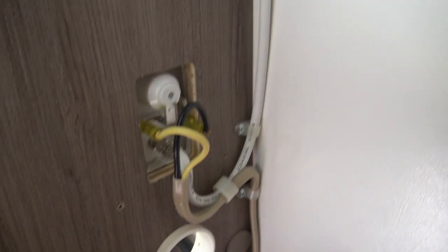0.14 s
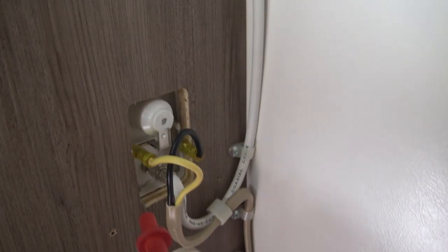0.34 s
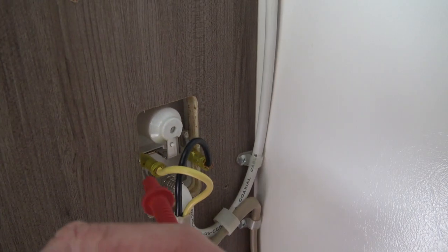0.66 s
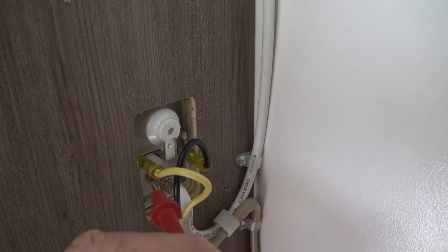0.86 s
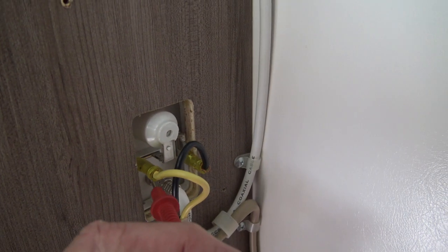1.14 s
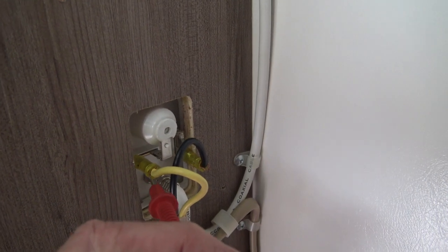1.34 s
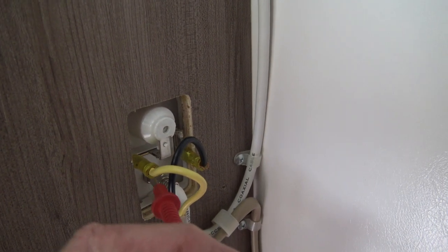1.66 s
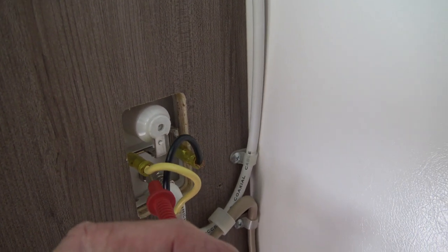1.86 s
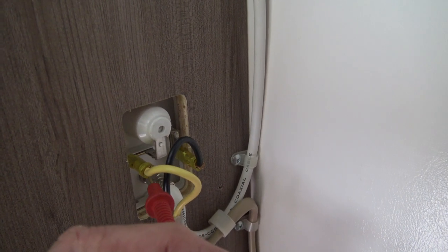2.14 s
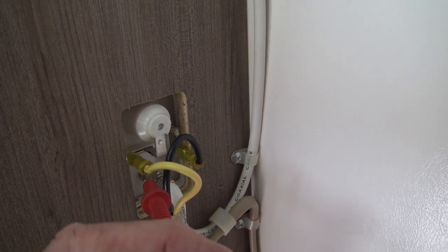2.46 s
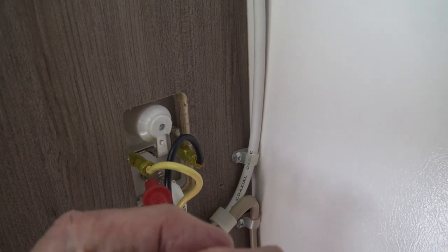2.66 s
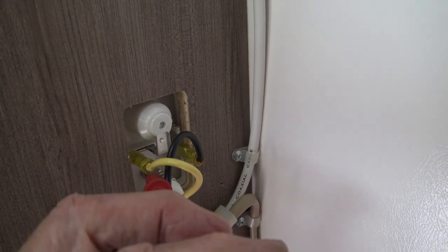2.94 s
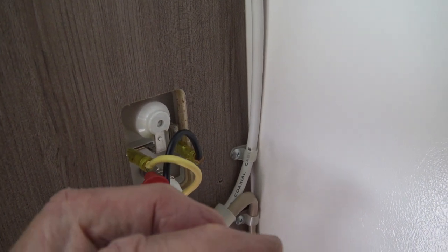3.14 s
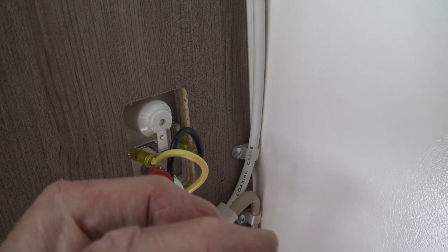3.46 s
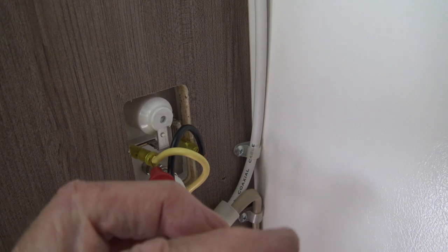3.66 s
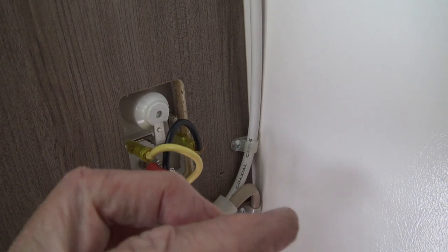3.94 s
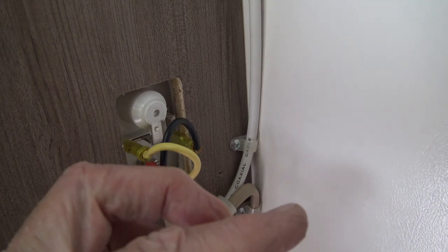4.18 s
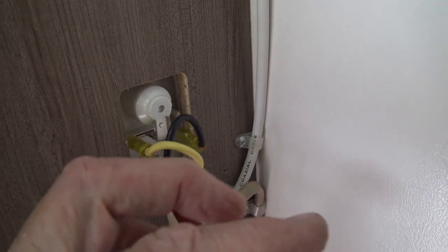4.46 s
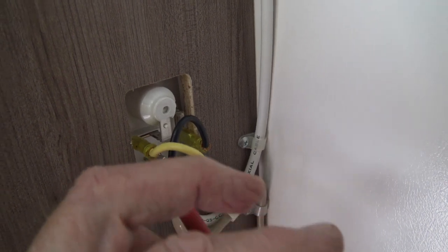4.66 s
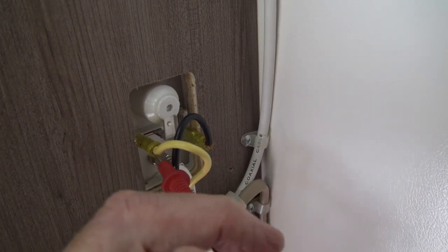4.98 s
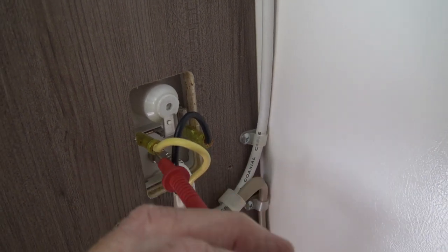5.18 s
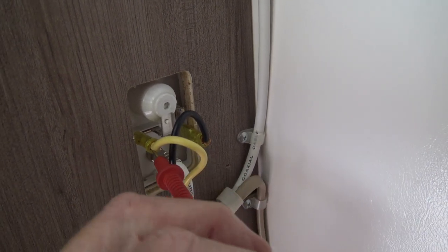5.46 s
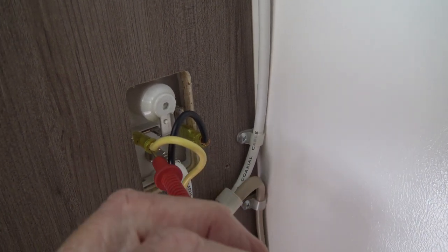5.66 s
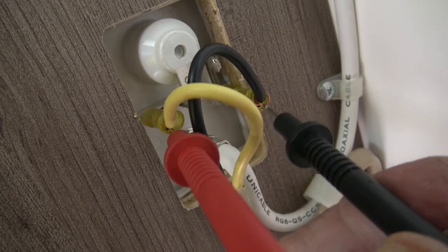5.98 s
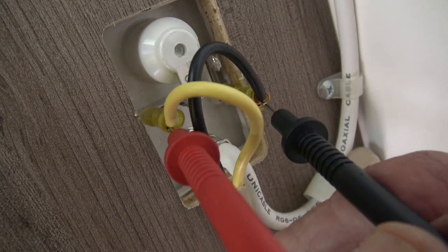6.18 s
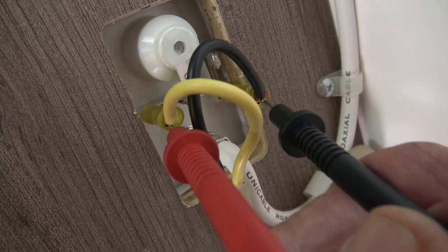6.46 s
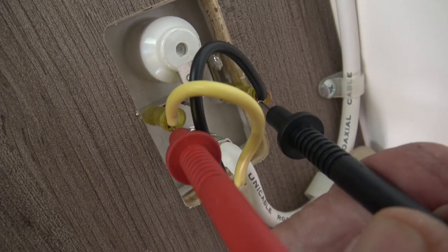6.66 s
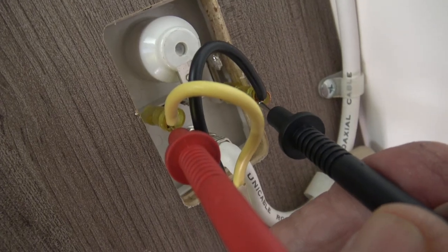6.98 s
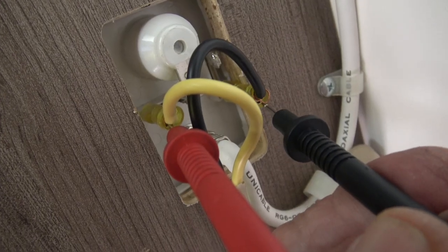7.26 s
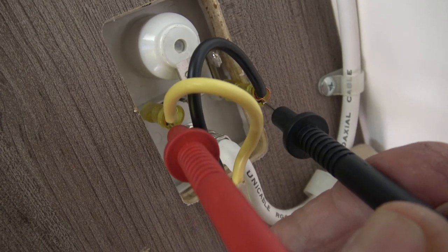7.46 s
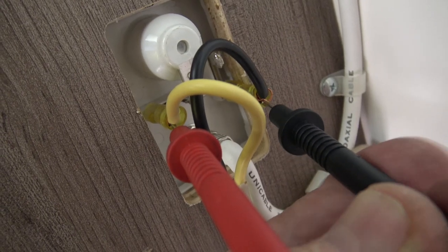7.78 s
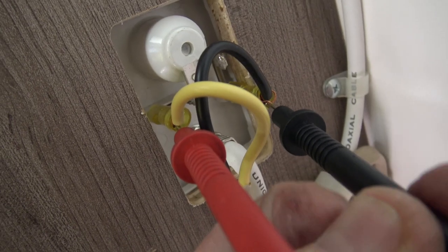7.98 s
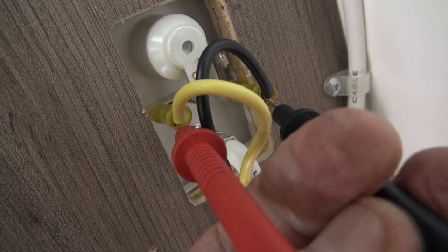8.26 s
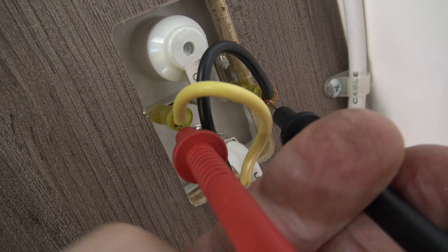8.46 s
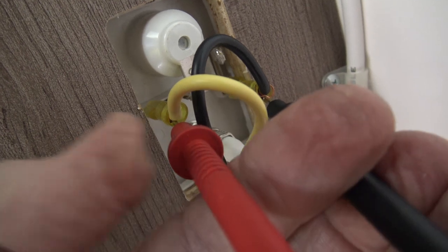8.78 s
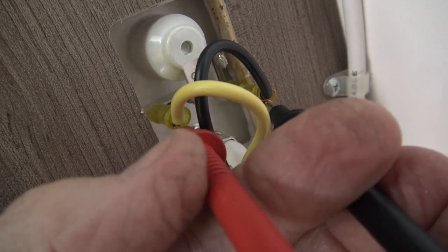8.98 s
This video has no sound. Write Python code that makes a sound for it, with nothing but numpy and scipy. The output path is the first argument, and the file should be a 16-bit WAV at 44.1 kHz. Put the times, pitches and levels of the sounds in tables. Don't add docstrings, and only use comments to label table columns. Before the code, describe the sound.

Irregular dry ticks and dull hollow thumps, one hard knock early on, then metallic clicks and scratchy slips over faint hum and hiss.

```python
import sys
import numpy as np
from scipy import signal
from scipy.fft import rfft, irfft, next_fast_len
from scipy.io import wavfile
from scipy.ndimage import uniform_filter1d

SR = 44100
rng = np.random.default_rng(int(sys.argv[2]) if len(sys.argv) > 2 else 0)


def materialize(psi):
    bounded = np.clip(np.atleast_2d(psi).T, -1, 1)
    quanta = np.round(bounded * 32767).astype(np.int16)
    wavfile.write(sys.argv[1], SR, quanta)


def gain_from_db(level_db):
    decades = np.asarray(level_db, float) / 20
    return 10 ** decades


N = 402015

# mode_hz, width_hz, level_db
CONNECTOR = [(660, 91, 18), (1763, 27, 3), (1985, 45, 8), (2740, 19, -4), (3250, 210, -7), (3840, 95, -4.5),
             (4900, 60, -22), (5800, 51, -19)]
# start_s, strength_db, depth_db, hardness_db, off_centre_db
THUMPS = [(1.594, -29.5, 4, -7, -6), (1.714, -26.5, 0, -3.5, 1), (2.747, -25.5, -5, -7, -2),
          (2.8048, -17.5, 0.5, -0.5, 3), (2.829, -22, 9.5, -3, 1.5), (2.865, -37.5, 9, 2, -17),
          (3.277, -38.5, 15, -3, -6), (3.354, -50, 22, 5, -13), (3.375, -35.5, -19, -4.5, -17),
          (3.62, -35.5, -0.5, 2, 6), (3.689, -34, 0, -10, 0), (3.747, -12, -0.5, -13.5, 1.5),
          (3.954, -26.5, 8.5, -9.5, 2), (3.9898, -38, 9, 1, -19), (4.221, -20, -2, -11.5, -1.5),
          (5.249, -26.5, -3.5, -5, 0.5), (5.88, -32, 1, -8, -6), (7.014, -28, 0, -7, -2),
          (7.599, -30, 2.5, -1, -3), (7.624, -31, -27, 2, -6.5), (7.825, -32, -0.5, -7.5, 1),
          (8.046, -22, -4, -5.5, -6)]


def evened(x):
    return x / np.sqrt(np.mean(x ** 2) + 1e-20)


def read(points, hz):
    f, value = np.transpose(points)
    return np.interp(np.log(hz + 1), np.log(f + 1), value)


def curve(rows, column=1):
    rows = np.array(rows)
    return np.interp(np.arange(N) / SR, rows[:, 0], rows[:, column])


def band(x, lo_hz, hi_hz, order=2):
    edges_hz = [lo_hz, min(hi_hz, .45 * SR)]
    return signal.sosfilt(signal.butter(order, edges_hz, "band", fs=SR, output="sos"), x)


def coloured(x, points):
    size = next_fast_len(N)
    gain = gain_from_db(read(points, np.fft.rfftfreq(size, 1 / SR)))
    return evened(irfft(rfft(x, size) * gain, size)[..., :N])


def resonate(x, hz, width_hz):
    r = np.exp(-np.pi * width_hz / SR)
    return 2 * signal.lfilter([1 - r], [1, -r * np.exp(2j * np.pi * hz / SR)], x).real


def body(x, modes, widen=1.0):
    skirt = 3
    total = 0
    for k, (hz, width_hz, db) in enumerate(modes):
        core = resonate(x, hz, widen * width_hz)
        total = total + (-1) ** k * gain_from_db(db) * evened(resonate(core, hz, skirt * widen * width_hz))
    return evened(total)


def add(mix, s, sound):
    part = mix[..., max(round(s * SR), 0):][..., :sound.shape[-1]]
    part += sound[..., :part.shape[-1]]


def grit(lumpy_db, lump_s, size=N):
    lumps, noise = rng.standard_normal((2, size))
    width = round(lump_s * SR)
    lumps = evened(uniform_filter1d(uniform_filter1d(lumps, width), width))
    return evened(noise * gain_from_db(lumpy_db * 2 * np.tanh(lumps / 2)))


def strokes(rows, controls, voice):
    out = np.zeros(N)
    for s, length_s, *strength in rows:
        part = np.linspace(0, 1, round(length_s * SR))
        add(out, s, voice(*controls(part, *strength)) * signal.windows.tukey(len(part), .12))
    return out


def drag(part, first_db, last_db):
    grip, let_go, edge_db = 0.27, 0.82, -5
    levels_db = [first_db + edge_db, first_db, last_db, last_db + edge_db]
    return [np.interp(part, [0, grip, let_go, 1], levels_db)]


def struck(modes, hits, shorten):
    out, t = np.zeros(N), np.arange(round(.15 * SR)) / SR
    hz, db, t60_s = np.transpose(modes)[..., None]
    draws = rng.standard_normal((len(hits), 2, len(modes), 1))
    for (s, hit_db, tilt_db), (detune, luck) in zip(hits, draws):
        level_db = hit_db + db + 0.85 * luck - tilt_db * np.log2(hz / 1600) - 60 * t / (shorten * t60_s)
        tones = np.sin(2 * np.pi * hz * (1 + 0.0066 * detune) * t) * np.sign(detune)
        add(out, s, (gain_from_db(level_db) * tones).sum(0) * np.minimum(t / 0.00055, 1))
    return out


def cabin(x):
    # band_hz, t60_s
    decay = [(500, 0.12), (1300, 0.092), (3500, 0.045), (9200, 0.066)]
    count = SR // 5
    taps = np.zeros((2, count))
    at = np.arange(120, count - 20, 20)
    at = at + rng.integers(0, 20, (2, len(at)))
    np.put_along_axis(taps, at, rng.choice([-1., 1.], at.shape), 1)
    taps[1] = 0.7 * taps[0] + .5 * taps[1]
    hz, t, z = signal.stft(taps, SR, nperseg=256)
    tail = signal.istft(z * gain_from_db(-60 * t / read(decay, hz)[:, None]), SR, nperseg=256)[1]
    return signal.fftconvolve(x[None], tail / np.linalg.norm(tail[0]), axes=1)[:, :N]


def background():
    # band_hz, density_db
    hum_spectrum = [(15, -53), (25, -48), (127, 0), (170, -19), (301, -14), (363, -10.5), (560, -34),
                    (641, -27.5), (840, -25), (1190, -38), (2910, -33), (16000, -38)]
    # time_s, level_db
    murmur = [(0, -41), (.2, -49), (0.32, -43), (.43, -49), (0.6, -53), (1.05, -51), (1.4, -56),
              (2.5, -54.5), (2.95, -52), (3.3, -64), (4, -46), (4.5, -55), (5.6, -60.5), (6.5, -53.5),
              (9.11, -58)]
    hum_db = -51.5
    common, own, low, sub = rng.standard_normal((4, N))
    own = 0.062 * own + 0.15 * band(own, 99, 3300) + .5 * band(own, 4460, 9900)
    hum = coloured(np.array([common + own, common - own]), hum_spectrum)
    rumble = evened(band(low, 58.8, 75.6, order=3)) + 0.2 * evened(band(sub, 37.7, 43, order=3))
    return gain_from_db(hum_db) * hum + gain_from_db(curve(murmur) + 1.0) * rumble


def peeps():
    # start_s, length_s, pitch_hz, peak_db, glide_hz
    calls = [
        (7.724, 0.013, 3280, -58, -60),
        (7.746, 0.029, 3180, -53, 120),
        (7.878, .016, 3350, -56, -120),
        (7.89, 0.03, 2830, -55, -40),
    ]
    out = np.zeros(N)
    for s, length_s, hz, db, glide_hz in calls:
        t = np.arange(round(length_s * SR)) / SR
        tone = np.sin(2 * np.pi * (hz + glide_hz * t / length_s / 2) * t)
        add(out, s, gain_from_db(db) * tone * signal.windows.tukey(len(t), .4))
    return out


def shudder():
    sway_hz, t60_s, sway_db = 37.7, 0.99, -26
    out, t = np.zeros(N), np.arange(SR) / SR
    sway = np.minimum(t / 0.024, 1) * gain_from_db(-60 * t / t60_s) * np.sin(2 * np.pi * sway_hz * t)
    for s, push_db, depth_db, *_ in THUMPS:
        add(out, s, gain_from_db(push_db + depth_db + sway_db) * sway)
    return out


def rustle():
    # time_s, level_db
    motion = [(0, -44), (.25, -44), (.4, -46.5), (.47, -50.5), (1.05, -57.5), (1.5, -55), (2.28, -59),
              (2.6, -58), (3.4, -56), (3.68, -59.5), (3.9, -54), (4.65, -57), (5.35, -52.5), (5.6, -58),
              (7.5, -63), (8.15, -57), (8.5, -59.5), (9.11, -63.5)]
    # band_hz, density_db
    dull = [(300, 2.5), (500, -6), (630, -3), (720, -1), (1050, 5.5), (1900, 0.5), (3200, -17), (4600, -70),
            (7700, -54)]
    bright = [(1500, -16.5), (2600, -3.5), (3800, -2.5), (7000, -5), (11500, -11), (15200, -17),
              (16000, -26)]
    n, motion_db = grit(lumpy_db=0.83, lump_s=0.0048), curve(motion)
    bright_db = -57 + 1.7 * (motion_db + 55.5)
    return gain_from_db(motion_db) * coloured(n, dull) + gain_from_db(bright_db) * coloured(n, bright)


def brushes():
    # start_s, length_s, first_db, last_db
    rows = [
        (1.33, 0.05, -53, -54),
        (2.22, 0.049, -52.5, -60),
        (2.83, 0.032, -50, -56),
        (3.745, 0.03, -45, -67),
        (3.86, 0.057, -56, -58),
        (6.316, 0.024, -54, -55),
        (7.317, .024, -54, -58),
        (7.828, 0.058, -47, -59),
        (7, 0.023, -57, -55),
        (8.31, 0.058, -53, -59),
    ]

    def voice(db):
        n = grit(lumpy_db=1.0, lump_s=0.002, size=len(db))
        peak = body(n, [(5850, 290, -1.0), (8370, 140, 2)])
        return gain_from_db(db) * evened(evened(band(n, 4400, 13000)) + 0.62 * peak)
    return strokes(rows, drag, voice)


def sweep(part, whistle_db, hiss_db):
    whistle_top, hiss_top = 0.24, 0.48
    whistle = np.interp(part, [0, 0.57 * whistle_top, whistle_top, .5, 1], [-9, 4.0, 3.5, 0.5, -18])
    hiss = np.interp(part, [0, hiss_top, 1], [-7, 0, -8])
    whistle_hz = 3900 - 306 * np.exp(-part / 0.101)
    return whistle_db + whistle, whistle_hz, hiss_db + hiss


def swish(db, hz, hiss_db):
    n, a, b = rng.standard_normal((3, len(db)))
    turn = 2 * np.pi * np.cumsum(hz) / SR
    fuzz = signal.sosfilt(signal.butter(2, 130, fs=SR, output="sos"), [a, b])
    lines = fuzz[0] * np.sin(turn) + 0.61 * fuzz[1] * np.sin(1.065 * turn)
    whistle = evened(lines + 0.11 * band(n, 2900, 4000))
    climb = 2 * np.pi * np.cumsum(np.linspace(4820, 4820 + 600, len(db))) / SR
    hiss = evened(band(n, 30, 440)) * np.sin(climb)
    hiss = hiss + 0.55 * evened(band(a, 30, 600)) * np.sin(climb)
    hiss = evened(hiss + 0.35 * evened(band(n, 4200, 7500, order=1)))
    grain = gain_from_db(1.2 * evened(uniform_filter1d(b, round(.006 * SR))))
    return grain * (gain_from_db(db) * whistle + gain_from_db(hiss_db) * hiss)


def swishes():
    # start_s, length_s, whistle_db, hiss_db
    rows = [
        (4.72, 0.21, -63, -62),
        (5.06, 0.23, -50, -53),
        (5.27, 0.23, -49.5, -49.5),
    ]
    return strokes(rows, sweep, swish)


def creaks():
    # start_s, length_s, first_db, last_db
    rows = [
        (1.9, .2, -58, -56),
        (2, 0.24, -60, -56),
        (4.4, 0.13, -58, -63),
        (3.15, 0.09, -62, -68),
    ]

    def voice(db):
        n = grit(lumpy_db=5.5, lump_s=0.015, size=len(db))
        return gain_from_db(db) * body(n, [(860, 100, -2.7), (1184, 80, -2), (1680, 85, 1)])
    return strokes(rows, drag, voice)


def squeaks():
    # start_s, length_s, first_db, last_db
    rows = [
        (0.36, 0.1, -44, -46),
        (.35, 0.097, -46, -54),
        (.05, 0.11, -48, -50),
    ]

    def voice(db):
        n = grit(lumpy_db=2.0, lump_s=.01, size=len(db))
        return gain_from_db(db) * body(n, [(1900, 45, -1.5), (2400, 51, 0)])
    return strokes(rows, drag, voice)


def rubs():
    # start_s, length_s, first_db, last_db
    rows = [
        (.27, 0.18, -40.5, -53),
        (.825, 0.11, -44, -43.5),
        (1.29, 0.11, -43.5, -43),
        (2.215, 0.065, -46, -50),
        (2.785, 0.023, -42, -34),
        (2.818, 0.056, -34, -42),
        (3.262, 0.02, -55, -39),
        (3.365, 0.049, -57, -64),
        (3.85, 0.072, -46, -48),
        (4.03, 0.059, -48, -58),
    ]

    def voice(db):
        n = grit(lumpy_db=3.0, lump_s=0.004, size=len(db))
        wide = evened(band(n, 460, 1510)) + .5 * evened(band(n, 1170, 3040, order=3))
        modes = body(n, [(1900, 27, -2), (2400, 320, -8), (2800, 130, -17)])
        return gain_from_db(db - 2.0) * evened(wide + 0.22 * modes)
    return strokes(rows, drag, voice)


def flecks():
    # start_s, level_db, pitch_hz
    rows = [
        (1.595, -50, 8600),
        (1.644, -50, 8500),
        (1.7125, -50, 8500),
        (1.7955, -41, 10200),
        (5.482, -50, 9500),
        (6.322, -50, 5800),
        (7.84, -43, 12500),
        (7.862, -52, 12500),
        (8.05, -51, 11000),
    ]
    out, t = np.zeros(N), np.arange(round(0.045 * SR)) / SR
    for (s, db, hz), n in zip(rows, rng.standard_normal((len(rows), len(t)))):
        speck = evened(band(n, 0.84 * hz, 1.05 * hz))
        add(out, s, gain_from_db(db - 60 * t / 0.049) * np.minimum(t / .0008, 1) * speck)
    return out


def creeps():
    # start_s, length_s, first_db, last_db
    rows = [
        (7.3, .11, -59, -51),
        (6.07, 0.083, -53, -61),
        (7.3, 0.063, -42, -49),
        (8.15, 0.046, -54, -49),
        (9.1, 0.049, -51, -57),
        (8.28, 0.07, -52, -50),
        (6.2, .06, -55, -58),
        (7.2, 0.07, -47, -63),
        (7.335, 0.022, -58, -48),
        (4.6, 0.058, -51, -58),
    ]
    modes = [(557, 91, 1.0), (736, 70, 5), (1650, 90, -1.0), (2050, 60, -15), (2740, 71, -3)]

    def voice(db):
        return gain_from_db(db) * body(grit(lumpy_db=8.0, lump_s=0.0042, size=len(db)), modes)
    return strokes(rows, drag, voice)


def scrapes():
    # start_s, length_s, first_db, last_db
    rows = [(6.322, 0.033, -54, -49), (6.343, 0.059, -49, -37), (6.4, 0.027, -37, -43),
            (6.474, 0.028, -44, -38.5), (6.5, 0.05, -32.5, -36.5), (6.54, 0.057, -41.5, -40),
            (7.09, 0.024, -54, -47), (7.2, .045, -45.5, -62), (7.385, 0.041, -51, -59),
            (7.578, 0.032, -42, -24), (7.83, 0.046, -50, -55)]

    def voice(db):
        n = grit(lumpy_db=2.0, lump_s=0.0027, size=len(db))
        return gain_from_db(db - 1.5) * evened(body(n, CONNECTOR, widen=2.0) + .85 * evened(band(n, 1470, 2870)))
    return strokes(rows, drag, voice)


def clinks():
    # mode_hz, level_db, t60_s
    modes = [(693, 4, 0.072), (787, 5, 0.11), (1286, -9.5, .07), (1570, -7, 0.084), (1690, 4, 0.052),
             (1940, -12, 0.027), (2023, -1, 0.064), (2810, -9, 0.046), (2960, -18, 0.031), (4200, -18, .03)]
    # start_s, level_db, low_tilt_db_per_octave
    hits = [(6.1638, -46.5, 3.5), (6.5745, -44, 11), (7.0145, -41, 3), (7.1125, -39, 1), (7.5825, -38, 1),
            (7.5895, -40, -2), (7.6005, -38, 3), (7.6255, -25, -3.5), (8.0455, -42, 0), (8.108, -53, 4),
            (8.206, -46, 2), (8.2615, -49, 10)]
    return struck(modes, hits, shorten=0.83)


def clacks():
    # mode_hz, level_db, t60_s
    modes = [(820, -12, 0.38), (1157, -2.5, 0.15), (1496, -1.5, 0.12), (2222, 1.5, 0.098),
             (2797, 1.5, 0.046), (2870, -34, 0.065), (3095, 1, 0.086), (3526, -14, 0.085),
             (3840, -15, 0.073), (3930, -3, 0.034), (4200, -12, 0.06), (4748, -19, 0.06), (4920, -11, 0.13)]
    # start_s, level_db, low_tilt_db_per_octave
    hits = [
        (.6045, -36, 0),
        (1.5335, -38, 2),
        (1.7127, -33.5, 1),
        (2.7472, -47, 7),
        (2.8058, -17, 2.5),
        (2.8657, -39, -3),
        (3.0834, -36.5, -4),
        (3.6205, -49, 17),
        (3.7485, -43, -4.5),
        (3.9569, -38.5, -2),
    ]
    return struck(modes, hits, shorten=0.4)


def ticks():
    # start_s, peak_db, centre_hz, wood_db, bright_db (both relative)
    taps = [(0.33, -33, 1500, 4, -4), (1.1001, -38, 1840, -6, -9), (1.4659, -31.5, 1900, 1, 1),
            (1.5326, -26.5, 2130, 1, -11.5), (1.5944, -34.5, 1830, 7, 2), (1.6444, -34, 2170, 5.5, -8),
            (1.7118, -28, 2080, 3, 1.5), (2.747, -39.5, 1580, 12.5, -2), (3.277, -34, 2150, 0, -6),
            (3.3468, -39.5, 2340, 5, -2), (3.6205, -55, 1520, 22, -8), (3.748, -28, 1780, 1, -4),
            (3.956, -29, 1900, 2.5, -3), (4.2203, -33, 1720, 1, -8), (4.313, -38.5, 2240, 2, 0),
            (4.401, -49, 1500, 17.5, -10), (4.4886, -50, 1590, 10.5, 10), (4.844, -41, 1990, 6.5, -9),
            (5.2492, -39.5, 1540, 14.5, -4), (5.533, -41.5, 1290, 6, -4), (5.874, -30, 1900, -5, -6)]
    blows = [
        (.604, -23, 2400, -8, -18),
        (.608, -22, 1900, -13, -6),
        (.635, -28.5, 2120, -2, -7),
        (2.8056, -10.5, 1900, 5.5, -11),
        (2.808, -20, 1900, -12, -28),
        (2.8165, -27, 1540, -15, -28),
        (2.8659, -29.5, 2250, -3, -1.5),
        (2.873, -36, 2000, 7, -19),
    ]
    # start_s, peak_db, centre_hz, bright_db
    clicks = [(0.0004, -16.5, 3900, -39), (1.7934, -27, 3330, -57), (1.8513, -43.5, 5630, -20.5),
              (1.8845, -39.5, 3240, -23), (2.337, -52, 6600, -30), (2.486, -45.5, 7900, -30),
              (2.608, -46, 9050, -30), (3.0835, -30, 2740, 3), (4.0247, -45.5, 3580, 15.5),
              (5.491, -56.5, 4070, 23.5), (5.74, -25.5, 3650, 12.5)]
    # start_s, peak_db, low_db, bright_db
    contacts = [(6.1634, -32.5, -2, -21), (6.346, -31, -4, -7), (6.4193, -33, 1, -4), (6.574, -22, -6, 1.5),
                (6.5798, -18.5, -1, -42), (7.0139, -25.5, 3.5, -9), (7.1115, -29.5, 4.5, -0.5),
                (7.2908, -38, 1, -15), (7.3642, -34.5, 4, -8), (7.5822, -31, 6, -6), (7.6, -24, 0, -5),
                (7.6251, -23.5, -10, -27), (7.7638, -34.5, 4.5, -18), (7.8012, -41, -3, 4),
                (7.8241, -39, 11, -20), (8.0451, -40.5, 7, 1), (8.2057, -38.5, 8.5, -5),
                (8.2611, -33.5, 2, -2), (8.552, -57.5, -12, 16.5)]
    # start_s, peak_db
    slips = [
        (0.6067, -27),
        (2.8044, -8),
        (7.6024, -17),
        (7.626, -6.5),
    ]
    # mode_hz, width_hz, level_db
    wood = [(695, 14, 3), (832, 75, -2), (1142, 114, 5), (1256, 300, 3), (1650, 45, -39)]
    on_metal_s, contact_hz, click_wood_db = 5.95, 1900, -4.5
    thin_hz, loose = 2600, 2.2
    t60_s, snap_s, edge_s, slip_s = 0.082, 0.0002, .00004, 0.00038
    out, t = np.zeros(N), np.arange(round(.12 * SR)) / SR
    rows = blows + taps
    rows = rows + [(s, db, hz, click_wood_db, b) for s, db, hz, b in clicks]
    rows = sorted(rows + [(s, db, contact_hz, low, b) for s, db, low, b in contacts])
    noise = rng.standard_normal((len(rows), len(t)))
    for (s, db, hz, low_db, bright_db), n in zip(rows, noise):
        metal = s > on_metal_s
        if metal:
            scratch = .85 * evened(band(n, 1450, 3620))
            colour = evened(body(n, CONNECTOR[1:], widen=loose) + scratch)
            low = body(n, CONNECTOR[:1], widen=1.76)
        else:
            colour = evened(band(n, 0.28 * hz, 1.87 * hz, order=4))
            low = body(n, wood, widen=0.97)
        ping = 1.7 if hz > thin_hz else .1 if metal else .4
        middle = evened(body(n, [(hz, 0.14 * hz, -3)]) * ping + colour)
        bright = evened(band(n, 4300, 8200, order=1))
        crack = middle * gain_from_db(-60 * t / t60_s)
        crack += gain_from_db(low_db) * low * gain_from_db(-60 * t / (1.17 * t60_s))
        crack += gain_from_db(bright_db - 4.5) * bright * gain_from_db(-60 * t / (0.85 * t60_s))
        crack += gain_from_db(-12) * evened(band(n, 1600, 6300)) * gain_from_db(-60 * t / (0.2 * t60_s))
        snap = gain_from_db(5.5 + 0.14 * (db + 36)) * (1 - t / snap_s) * np.exp(-t / snap_s) * 3
        snap = snap * np.minimum(t / (edge_s * gain_from_db(-.6 * bright_db)), 1)
        swell = np.minimum(t / 0.0013, 1) * (1 + 0.74 * np.exp(-t / 0.0035))
        add(out, s, gain_from_db(db - 7.0) * (crack * swell - snap))
    u = t / slip_s
    for s, db in slips:
        add(out, s, gain_from_db(db) * u * (2 - u) * np.exp(-u) * np.cos(u))
    return out


def leaning(depth_share):
    # middle_s, half_length_s, strength_db, depth_db
    leans = [(0, 0.47, -48.5, -13), (0.337, 0.18, -54, 11.5), (0.76, 1, -58, 2), (1.4, .4, -59, 7),
             (1.87, 0.92, -55, 1.5), (2.246, 0.035, -42.5, -12), (2.31, 0.026, -48, -10),
             (3.281, 0.021, -36.5, 5), (3.435, 0.13, -59.5, 6), (3.674, 0.055, -45, 8),
             (3.718, 0.083, -48, 10), (3.877, 0.77, -56, 5.5), (4.205, 0.027, -43, 6),
             (4.328, 0.05, -42, -8), (4.376, 0.49, -46, 1), (4.404, 0.061, -38.5, -6),
             (4.623, .16, -44.5, -1), (4.802, 0.15, -44.5, -1), (5.336, 0.29, -48.5, -11),
             (6.1, 0.33, -52, -15), (6.69, 1, -55.5, -1), (7.202, 0.75, -56.5, -3),
             (7.697, 0.65, -58.5, 3.5), (8.325, 0.6, -52.5, -14), (8.401, .05, -46, -18),
             (8.453, 0.02, -46, -16)]
    fall_db, rest_db = 16.5, -66
    t = np.linspace(0, N / SR, N // 64)
    leans_db = [db + depth_share * depth_db - fall_db * abs(t - s) / half_s
                for s, half_s, db, depth_db in leans]
    level_db = np.maximum(np.max(leans_db, axis=0), rest_db)
    return gain_from_db(np.interp(np.arange(N) / SR, t, level_db))


def panel():
    # mode_hz, t60_s, left_right_db, level_db (within its family)
    modes = [(116, 0.17, 1.15, 5.5), (149.4, 0.23, 2, 0.5), (301, 0.12, 3, 9.5), (290.3, 0.032, 4, 14.5),
             (200, 0.073, 5, -6), (450.3, 0.093, 1.5, 3), (421, 0.027, 2, 13.5), (494, 0.047, -2.5, -1.5),
             (567, 0.13, 6.5, -14), (704, 0.037, 0.5, -1), (855, 0.098, -5, -16.5)]
    families = [0, 1, 2, 2, 2, 3, 3, 3, 3, 3, 3]
    signs = [1, -1, 1, -1, 1, 1, -1, -1, 1, -1, 1]
    rise_cycles = [0.18, 0.14, 1, 0.28]
    # start_s, strength_db, depth_db, hardness_db
    nudges = [(.001, -38, -8, 1.5), (0.263, -52, 6, 9), (0.288, -57, 0, 0), (0.326, -38.5, -4, 1),
              (0.6, -39.5, -12, -1), (1.343, -56.5, -4, 14.5), (1.531, -36, -13, -4.5),
              (2.079, -44, -2, -10), (2.226, -40.5, 0, -9), (4.301, -32.5, -4, -6), (4.401, -50, -15, 1),
              (4.834, -39.5, 0, 0.5), (4.947, -41.5, 2.5, -8), (5.179, -51, 14, 3), (5.741, -42, -4, -5.5),
              (6.164, -39.5, -4, -8), (6.414, -37.5, -16, 0), (6.422, -29, -6, -10),
              (6.575, -26.5, -6.5, -2.5), (6.911, -39.5, -22, -5.5), (7.391, -39, -4, -11),
              (7.764, -40, -8, -1.5), (7.887, -42, -13, -2.5), (8.209, -31, -4.5, -13),
              (8.263, -31, -12, -7.5), (8.357, -40.5, -1, -7)]
    nudge_off_centre_db = -1
    out, t = np.zeros((2, N)), np.arange(round(.35 * SR)) / SR
    touch = grit(lumpy_db=4.5, lump_s=0.023)
    deep, flat = leaning(0.99), leaning(0)
    pressure = [deep * gain_from_db(1.5), deep * gain_from_db(-5.0), flat * gain_from_db(-2.47), flat * gain_from_db(-1.5)]
    knocks = THUMPS + [(*row, nudge_off_centre_db) for row in nudges]
    for (hz, t60_s, pan_db, db), family, sign in zip(modes, families, signs):
        mode = np.zeros(N)
        rise = (1 - np.exp(-t * hz / rise_cycles[family])) ** 2
        ring = -sign * rise * gain_from_db(-60 * t / t60_s) * np.sin(2 * np.pi * hz * t)
        for s, push_db, depth_db, hard_db, off_db in knocks:
            family_db = [depth_db, depth_db + off_db, 0, hard_db][family]
            add(mode, s, gain_from_db(push_db + family_db + db + 3.0) * ring)
        rubbed = evened(resonate(resonate(touch, hz, 2.8 / t60_s), hz, 37))
        mode += pressure[family] * gain_from_db(db) * t60_s / 0.15 * rubbed
        out += mode * gain_from_db([[pan_db / 2], [-pan_db / 2]])
    return band(out, 72, 4400)


def scene():
    large = background() + shudder() + panel()
    small = peeps() + rustle() + brushes() + swishes() + creaks() + squeaks() + rubs()
    small = small + creeps() + scrapes() + clinks() + clacks() + ticks()
    echoes = gain_from_db(-9.0) * cabin(small) + flecks()
    apart = gain_from_db(-0.5) * band(echoes[0] - echoes[1], 5500, 15000) * np.array([[1], [-1]])
    return large + small * gain_from_db([[-.4], [.4]]) + echoes + apart


def band_limit(x):
    return signal.sosfilt(signal.butter(12, 16980, fs=SR, output="sos"), x)


def record(dry):
    dry = signal.oaconvolve(dry, signal.firwin(1023, 15900, fs=SR)[None], "same")
    return band_limit(1.233 * np.tanh(dry / 1.53))


dry = scene()
out = record(dry)
materialize(out)
```